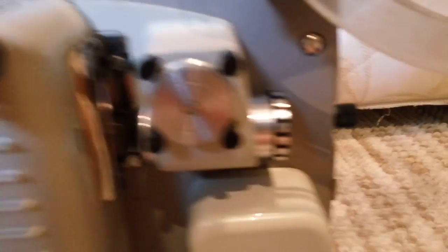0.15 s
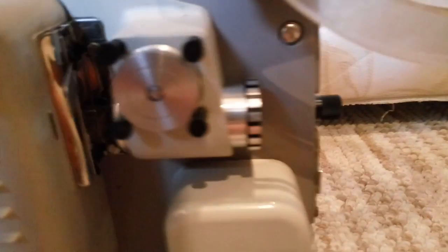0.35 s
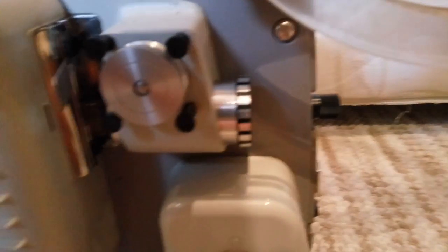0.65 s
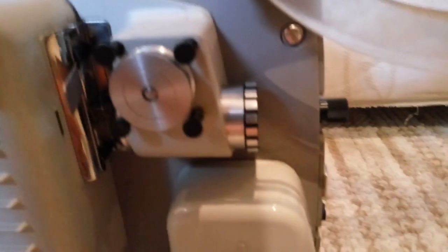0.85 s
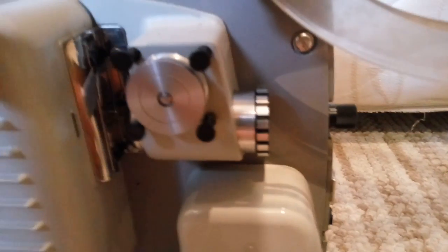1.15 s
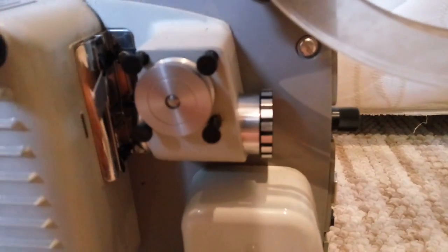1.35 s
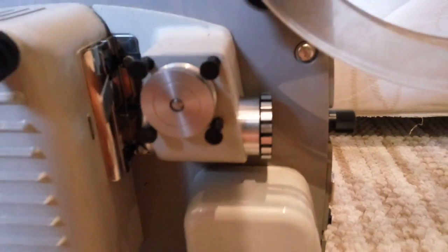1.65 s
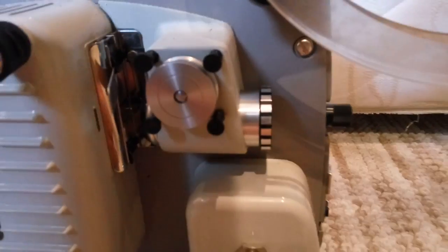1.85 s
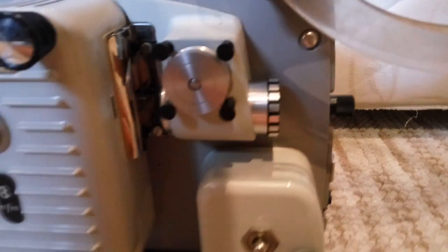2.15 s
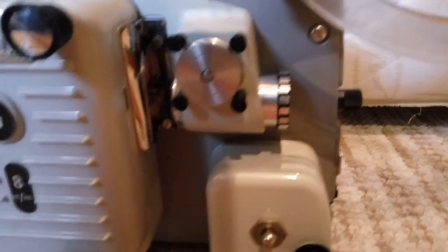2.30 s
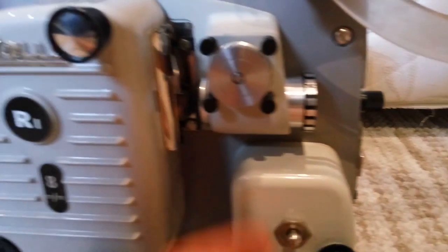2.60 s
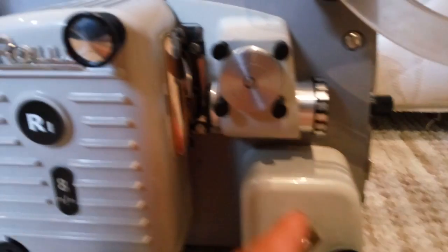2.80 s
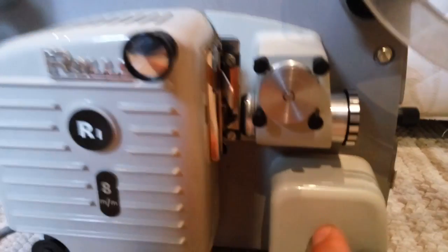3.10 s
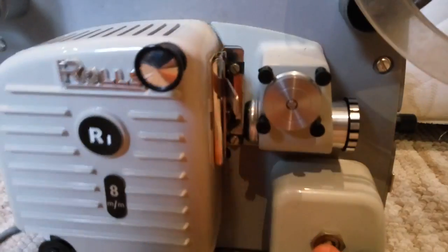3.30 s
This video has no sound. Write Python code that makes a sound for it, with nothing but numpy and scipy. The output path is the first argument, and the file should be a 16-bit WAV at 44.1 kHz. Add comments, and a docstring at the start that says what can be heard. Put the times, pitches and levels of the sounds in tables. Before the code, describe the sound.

Close stereo phone pickup of a running film projector in a small room, about nineteen claw strokes per second over gear rattle and fan hiss, then a loud switch snap with the mechanism louder just after.

```python
"""A small film projector runs close to a phone with two differently voiced microphone ports.
From the start, each turn of the claw cam thuds the hollow housing and strikes the ringing metal parts.
Random gear rattle, bright noise ticks, hissing fan air and a wavering motor hum run along with it.
Near the end a finger snaps the toggle switch: short rings, softer lever knocks, crackle and a room tail.
The phone clips whatever is too loud for it; after the snap the mechanism is louder."""
import sys
import numpy as np
from scipy import signal
from scipy.fft import rfft, irfft
from scipy.io import wavfile
from scipy.ndimage import uniform_filter1d

SR = 44100
rng = np.random.default_rng(int(sys.argv[2]) if len(sys.argv) > 2 else 0)


def master(y):
    """Save y as 16-bit WAV."""
    cut = np.clip(np.atleast_2d(y).T, -1, 1)
    pcm = np.round(cut * 32767)  # scale
    wavfile.write(sys.argv[1], SR, pcm.astype(np.int16))


N = 152586  # length in samples


def undb(db):
    """Turn decibels into a gain."""
    return 10 ** (np.asarray(db) / 20)


def unit(x):
    """Scale to an rms (average strength) of 1."""
    return x / np.sqrt(np.mean(x ** 2))


def ring(x, hz, t60):
    """One ringing tone (a mode): fades by 60 dB in t60 seconds, gain 1 at its centre."""
    r = np.exp(-np.log(1000) / (t60 * SR))
    top = [(1 - r * r) / 2, 0, -(1 - r * r) / 2]
    bottom = [1, -2 * r * np.cos(2 * np.pi * hz / SR), r * r]
    return signal.lfilter(top, bottom, x)


def band(x, order, hz, kind="low"):
    """Butterworth filter: keep the lows, the highs or a band."""
    return signal.sosfilt(signal.butter(order, hz, kind, fs=SR, output="sos"), x)


def clicks(seconds, size):
    """Very short blows at given times, each shared between two neighbouring samples."""
    at = np.clip(np.ravel(seconds) * SR, 0, N)
    i = at.astype(int)
    size = np.ravel(size) * (at > 0)
    early = np.bincount(i, size * (1 - at + i), N + 2)
    late = np.bincount(i + 1, size * (at - i), N + 2)
    return (early + late)[:N]


def walk(rate_hz):
    """Slow random wander, rms 1: random steps at this rate, smoothed twice."""
    k = int(SR / rate_hz)
    steps = np.repeat(rng.standard_normal(200), k)[:N]
    return unit(uniform_filter1d(uniform_filter1d(steps, k), k))


def turns():
    """Start time of every turn of the cam, which runs a little early or late."""
    cycle_hz = 19.455
    # How late the cam runs. Each row: time in seconds, lateness in ms.
    lateness = [(0.03, 0.81), (0.44, 0.068), (0.85, -0.75), (1.26, -0.062), (1.67, -0.19), (2.08, 0.17),
                (2.49, 0.47), (2.9, -0.19), (3.32, 0.67)]
    t = np.arange(-1, N / SR * cycle_hz)[:, None] / cycle_hz
    return t + np.interp(t, *np.array(lateness).T) / 1000


def drive(column):
    """Gain curve of one layer as it grows stronger and weaker."""
    # Each row: time in seconds, thud level in dB, level of the casing and plate rings in dB,
    # claw ring in dB, spring ring in dB.
    drive_levels = [(0, 5, 0.5, -7, -2), (.15, 2.5, 5.5, -2.5, -4), (.4, 5, 2, 2, 5.5), (.55, 4, 1.5, 3, 3),
                    (.8, 0, 1, 1, 1), (.9, 2, 3.5, 6, -1.5), (1.08, 3.5, 3.5, 0.5, 1.5),
                    (1.26, 0.5, 4, 4, -1), (1.42, 3.5, 3.5, -2.5, 0), (1.6, 4, 3, 8, 3),
                    (1.8, 1, 2.5, 4.5, 4.5), (2.0, 3, 0, 0.5, -3), (2.25, 3, 4.5, 1, 2),
                    (2.45, 2.5, 3.5, 3, -0.5), (2.65, 3.5, 4.5, 1.5, 4), (2.85, 2.5, 4, -2.5, 1),
                    (3.0, 2.5, 3, -1.5, 3), (3.15, 1.5, 2.5, 0.5, 3.5), (3.4, 2.5, 0.5, 0, 5)]
    table = np.array(drive_levels)
    return undb(np.interp(np.arange(N) / SR, table[:, 0], table[:, column]))


def housing():
    """Soft thuds and a loose shudder ring the hollow housing; its tones swell slowly."""
    # Thuds of one turn. Each row: ms into the turn, level in dB, direction and size of the push.
    thuds = [(3.37, -4, 1), (13.635, 8.5, 0.74), (21.69, -9.5, 1), (43.27, 5.5, 0.72)]
    # Housing tones over its boom. Each row: Hz, fade time t60 in seconds, level in dB, swell in dB.
    housing_modes = [(254, 0.1, -10, 14), (332.3, 0.26, -5.5, 6.5), (425.9, 0.23, -2, 1),
                     (505, 0.19, -21, 0)]
    jitter_ms, scatter_db = .35, 1.1
    shudder_db, push_ms, thud_db = -9.5, 1.48, -40.5
    swell_s, swell_top_s = 1.157, 0.36  # one swell lasts swell_s and peaks at swell_top_s

    ms, db, way = np.array(thuds).T
    start = turns()
    chance = rng.standard_normal((len(start), len(ms), 2))
    when = start + (ms + jitter_ms * chance[..., 0]) / 1000
    blows = clicks(when, way * undb(db + scatter_db * chance[..., 1]))
    push = unit(blows) + undb(shudder_db) * rng.standard_normal(N)
    # a soft push spreads each blow over a short hump
    push = np.convolve(push, np.hanning(push_ms * SR / 1000))[:N]

    swell = np.cos(2 * np.pi * (np.arange(N) / SR - swell_top_s) / swell_s)
    boom = band(push, 3, [318, 436.8], "band")
    tones = sum(undb(level_db + swell_db * swell) * ring(boom + push / 10, hz, t60)
                for hz, t60, level_db, swell_db in housing_modes)
    return unit(boom + tones) * undb(thud_db) * drive(1)


def cam_strokes():
    """Sharp strokes on every turn, plus a few harder knocks, for each part."""
    # Strokes of one turn. Each row: ms into the turn, dB into the casing, dB into the gate plate,
    # dB into the claw, dB into the spring, bright tick in dB.
    turn_strokes = [(0.5, -5, -6, -14, -3, -10), (6.5, -3, -7, -2, -12, -6), (11.3, 0, -7, -9, 0, -20),
                    (15.5, -2, -14, -16, -6, -22), (23, -6, -6, -14, -8, -15), (26.6, 0, -12, -12, -14, -3),
                    (28.3, -2, 0, 0, -9, -3), (33, -2, -14, -14, -16, -22), (35.5, -4, -5, -6, -9, 2),
                    (39.5, -4, -16, -5, -18, -14), (48.5, -3, -12, -1, -20, -9)]
    # Single harder knocks. Each row: time in seconds, dB into casing and plate,
    # dB into claw and spring, bright tick in dB.
    hard_knocks = [(0.543, -3, -2, -5), (0.702, -3, -2, -6), (1.2812, 2, 8, -20), (1.9795, 3, 1, -1),
                   (3.268, -4, -2, -6)]
    # Random spread of the stroke level in dB: casing, plate, claw, spring, bright tick.
    stroke_scatter_db = [2, 1.5, 2.5, 2.5, 1]
    jitter_ms = .22

    table, hard, start = np.array(turn_strokes), np.array(hard_knocks), turns()
    chance = rng.standard_normal((len(start), len(table), 6))
    when = start + (table[:, 0] + jitter_ms * chance[..., 0]) / 1000
    parts = []
    for k, scatter_db in enumerate(stroke_scatter_db):
        regular = clicks(when, undb(table[:, k + 1] + scatter_db * chance[..., k + 1]))
        knocks = clicks(hard[:, 0], undb(hard[:, 1 + k // 2]))
        parts.append(unit(regular + knocks))
    return parts


def gear_rattle():
    """Loose gears: many small blows at random times, sizes and directions, for each port."""
    rattle_per_s, spread_db = 800, 2.0
    loose = rng.random((2, 8000, 3))[:, :int(rattle_per_s * N / SR)]
    ports = []
    for at, size, way in loose.transpose(0, 2, 1):
        sizes = undb(-spread_db * np.log(size))  # mostly small, now and then large
        ports.append(unit(clicks(at * N / SR, np.sign(way - .5) * sizes)))
    return np.array(ports)


def metal_parts(strokes, rattle, rattle_db, gains):
    """Strokes and rattle ring the metal parts; each tone wavers in level."""
    # Metal tones. Each row: Hz, fade time t60 in seconds, left level in dB, right level in dB.
    metal_modes = [(825.4, 0.02, -20.5, -17), (907.3, 0.039, -11, -13.5), (1159.6, 0.05, -13.5, -10),
                   (1349, 0.06, -29, -10), (1570, 0.04, -26.5, -14), (1752, 0.034, -27, -13),
                   (1846, 0.055, -19, -20), (2277, 0.028, -19, -22.5), (2560, 0.023, -31, -10),
                   (3322, 0.025, -33, -5.5), (3811, 0.029, -27.5, -7), (3920, 0.03, -25.5, -24),
                   (4500, 0.018, -34.5, -35.5), (7100, 0.018, -37, -53)]
    part_from_hz = [2100, 3000, 3600, 4200]  # where plate, claw, spring and bright part begin
    shared_under_hz = 1100  # above this each port hears its own share of the rattle
    waver_db, waver_hz = 1.3, 6
    out = np.zeros((2, N))
    for hz, t60, left_db, right_db in metal_modes:
        part = np.searchsorted(part_from_hz, hz)
        loose = rattle if hz > shared_under_hz else rattle[[0, 0]]
        blows = unit(strokes[part] + undb(rattle_db[part]) * loose)
        tone = ring(ring(blows, hz, t60 / 4), hz, t60)  # the first ring softens the onset
        out += undb([[left_db], [right_db]]) * tone * undb(waver_db * walk(waver_hz)) * gains[part]
    return out


def fan_air():
    """Fan hiss: noise whose bass is common to both ports and whose treble is separate."""
    shared, own = rng.standard_normal(N), rng.standard_normal((2, N))
    return band(own + band(shared - own, 1, 1500), 1, 18000)


def gate_ticks(strokes, rattle, rattle_db):
    """Bright bursts of noise that chatter briefly after each stroke and rattle blow."""
    chatter_ms = 1.7  # each burst is strongest after half this time
    u = np.arange(SR // 50) * 1000 / SR / chatter_ms
    blows = strokes[-1] + undb(rattle_db[-1]) * abs(rattle[0])
    chatter = unit(np.convolve(blows, u * np.exp(-2 * u))[:N])
    return band(chatter * rng.standard_normal((2, N)), 1, [2600, 9000], "band")


def colour(x, column):
    """Filter a sound to one port's broad colour, with the energy as early as possible."""
    # Broad colour between the metal tones. Each row: Hz, left level in dB, right level in dB.
    broad_colour = [(30, -17.5, -14.5), (60, -30.5, -20), (151, -19.5, -29), (230, -14, -14.5),
                    (450, -22, -20.5), (600, -29.2, -23.5), (755, -21.5, -17), (1110, -13, -28),
                    (1430, -19.5, -16), (2070, -27.5, -22.5), (2470, -30, -20), (3080, -32.5, -15.1),
                    (3500, -31, -22), (4030, -32.5, -30.5), (4780, -29.5, -31), (5830, -35.5, -36),
                    (6800, -35, -51), (7480, -33.5, -47), (8290, -45.5, -48.5), (10450, -54, -52.5),
                    (12000, -57, -51), (15500, -60, -64)]
    table = np.array(broad_colour)
    hz = np.arange(1025) * SR / 2048 + 1
    level_db = np.interp(np.log(hz), np.log(table[:, 0]), table[:, column])
    # folding the cepstrum (the spectrum of the log levels) makes the filter minimum-phase
    cepstrum = irfft(level_db * np.log(10) / 20)
    cepstrum[1:1024] *= 2
    cepstrum[1025:] = 0
    return signal.fftconvolve(x, irfft(np.exp(rfft(cepstrum))))[:N]


def mechanism():
    """Ringing metal parts, with ticks and fan air filling the gaps between their tones."""
    # Loose rattle against the strokes in dB: casing, plate, claw, spring, bright tick.
    rattle_db = [-3, -5, -8, -9, -16]
    tick_start_db, tick_fade_db_per_s = 8, 1
    fan_db, tick_db, machine_db = -4, -3.5, -16.5
    jolt_s, jolt_db = 3.405, 8  # after the switch the whole mechanism is louder

    t = np.arange(N) / SR
    strokes, rattle = cam_strokes(), gear_rattle()
    bright_gain = undb(tick_start_db - tick_fade_db_per_s * t)
    # casing and plate share one gain curve
    gains = [drive(2), drive(2), drive(3), drive(4), bright_gain]
    out = metal_parts(strokes, rattle, rattle_db, gains)

    air = fan_air()
    ticks = gate_ticks(strokes, rattle, rattle_db)
    for c in range(2):
        out[c] += colour(undb(tick_db) * bright_gain * ticks[c] + undb(fan_db) * air[c], c + 1)
    return out * undb(machine_db + jolt_db * (t > jolt_s))


def hum():
    """Motor hum: steady mains tones whose level wavers together."""
    # Each row: Hz, rms level in dB before the waver.
    hum_tones = [(99.9, -57), (199.8, -82)]
    waver_db, waver_hz = 3, 6.9
    t = np.arange(N) / SR
    tones = sum(np.sqrt(2) * undb(db) * np.sin(2 * np.pi * hz * t) for hz, db in hum_tones)
    return tones * undb(waver_db * walk(waver_hz))


def switch():
    """The toggle's contacts, duller lever knocks and crackling loose bits ring the switch and the room."""
    # Hits of the contacts. Each row: time in seconds, level in dB.
    snap_hits = [(3.38705, 0), (3.38876, -1)]
    # Softer lever knocks: a faint tick just before the snap, then bounces after it.
    # Each row: time in seconds, level in dB.
    lever_knocks = [(3.3865, -17), (3.3907, -9.5), (3.3932, -14.5), (3.3955, -16), (3.403, -17),
                    (3.4195, -32), (3.4228, -40), (3.4445, -31), (3.4545, -33)]
    # Switch tones. Each row: Hz, fade time t60 in seconds, left level in dB, right level in dB.
    switch_modes = [(109, 0.094, -43, -36), (328, 0.024, -27, -17.5), (740, 0.0048, -40, -6.5),
                    (920, 0.0029, -13, -5), (1530, 0.032, -20.5, -31), (2136, 0.02, -44, -10),
                    (2606, 0.0039, 0.5, 2), (3010, 0.0087, -38, 4.5), (3570, 0.011, -22, 0.5),
                    (4160, 0.028, -18.5, -31), (5120, 0.012, -12, -9), (5765, 0.0056, 3, -6.5),
                    (6430, 0.027, -23, -18), (7190, 0.0071, -3, -35), (7900, 0.0057, -31, -37),
                    (10550, 0.0016, 1.5, -18), (13700, 0.0044, -13, -25)]
    knock_top_hz, switch_db, room_db = 4250, 0.5, -23
    crackle_db, crackle_t60_s, crackle_per_s = -23, .03, 3000

    snaps, knocks = (clicks(at, undb(db))
                     for at, db in (np.array(snap_hits).T, np.array(lever_knocks).T))
    after = np.arange(200) / crackle_per_s
    size = rng.standard_normal(200) * undb(crackle_db - 60 * after / crackle_t60_s)
    crackle = clicks(snap_hits[0][0] + after, size)
    hits = snaps + band(knocks, 3, knock_top_hz) + crackle

    direct = 0
    for hz, t60, left_db, right_db in switch_modes:
        # scaled so that the table's dB sets the size of the first swing
        tone = ring(hits, hz, t60) * t60 * SR / (2 * np.log(1000))
        direct = direct + undb([[left_db], [right_db]]) * tone
    direct = direct * undb(switch_db)
    return direct + undb(room_db) * signal.fftconvolve(direct, room_tail(), axes=1)[:, :N]


def room_tail():
    """Short room echo for each port: fading noise of energy 1 that builds up at first."""
    t60_s, build_up_ms, top_hz = 0.16, 5.4, 6800
    t = np.arange(SR // 4) / SR
    fade = undb(-60 * t / t60_s) * np.clip(t * 1000 / build_up_ms, 0, 1)
    tail = band(rng.standard_normal((2, len(t))) * fade, 2, top_hz)
    return tail / np.sqrt(np.sum(tail ** 2, axis=1, keepdims=True))


def scene():
    """Projector and switch at the two ports; the machine reaches the right port a little later."""
    right_lag_ms = .15
    machine = housing() + mechanism()
    machine[1] = np.interp(np.arange(N) - right_lag_ms * SR / 1000, np.arange(N), machine[1])
    return machine + hum() + switch()


def record(dry):
    """The phone clips loud peaks, thins the deepest bass and cuts the top."""
    clip, low_hz, top_hz = 1.0, 55, 15650
    thin = band(np.clip(dry, -clip, clip), 1, low_hz, "high")
    return signal.sosfilt(signal.ellip(8, .2, 70, top_hz, fs=SR, output="sos"), thin)


dry = scene()
out = record(dry)
master(out)
```